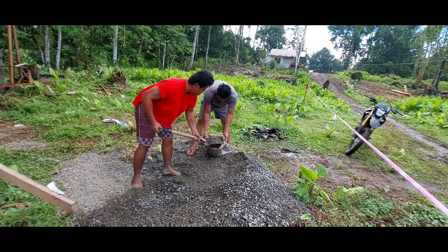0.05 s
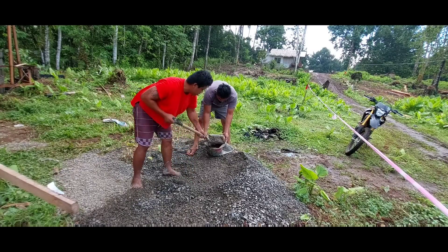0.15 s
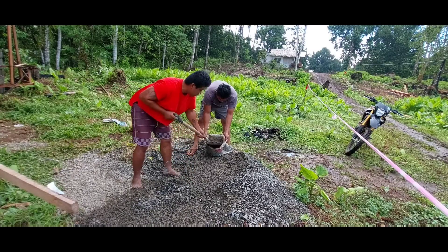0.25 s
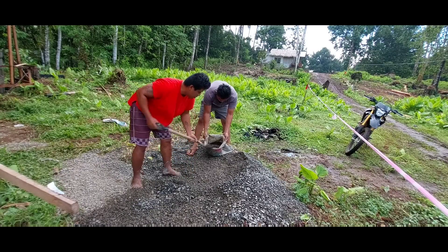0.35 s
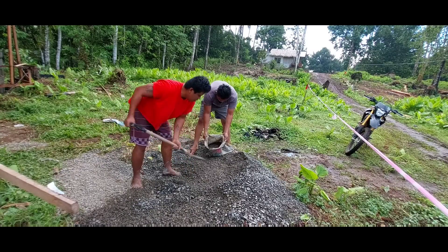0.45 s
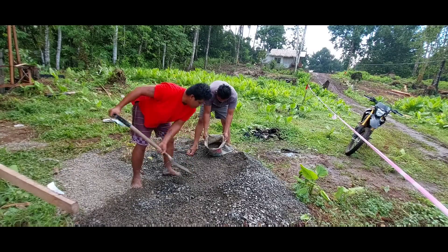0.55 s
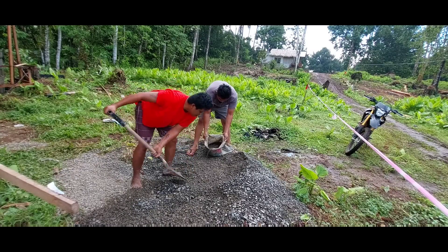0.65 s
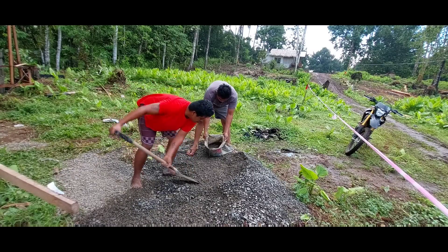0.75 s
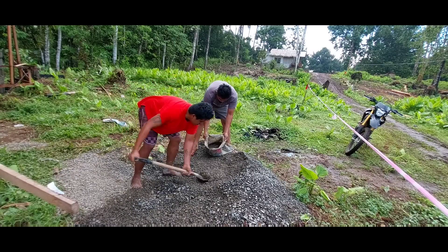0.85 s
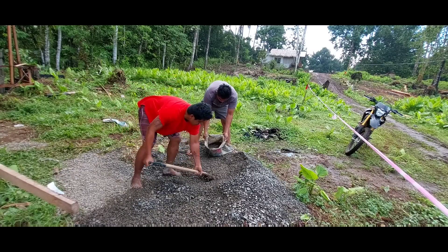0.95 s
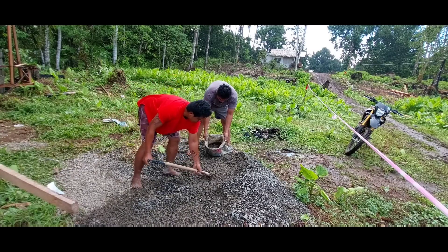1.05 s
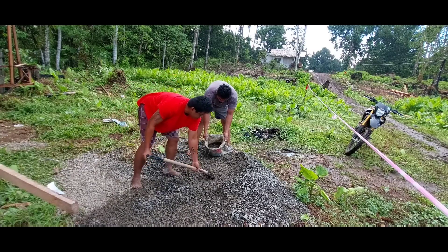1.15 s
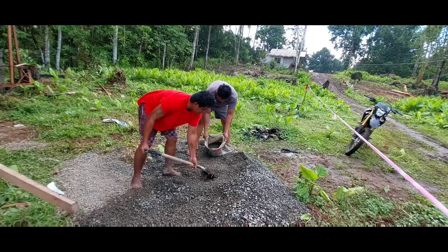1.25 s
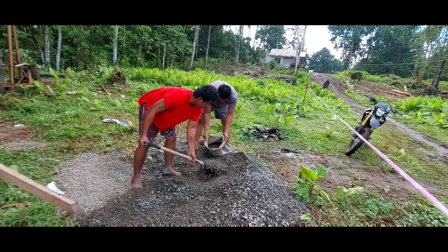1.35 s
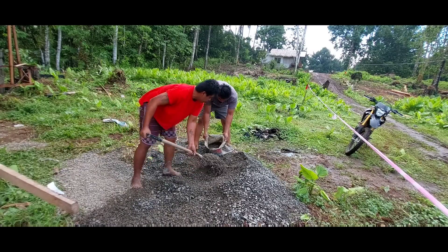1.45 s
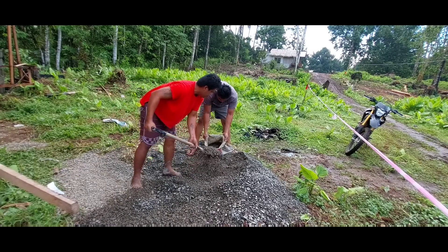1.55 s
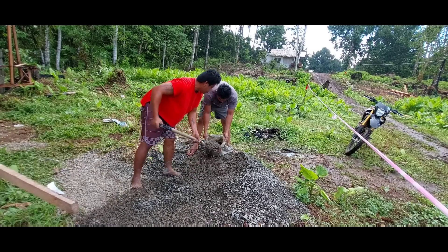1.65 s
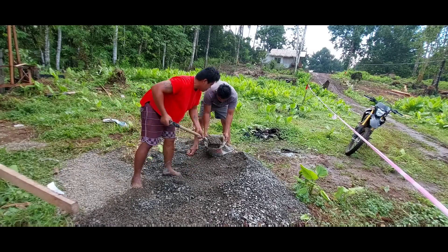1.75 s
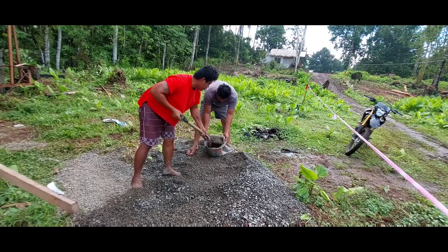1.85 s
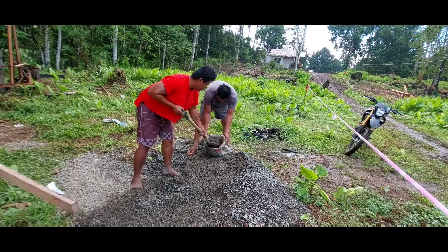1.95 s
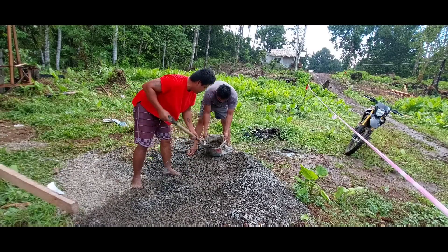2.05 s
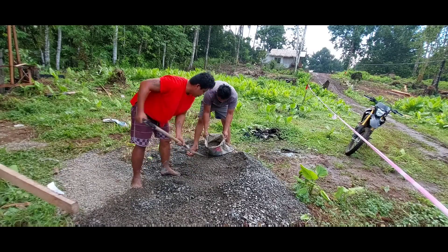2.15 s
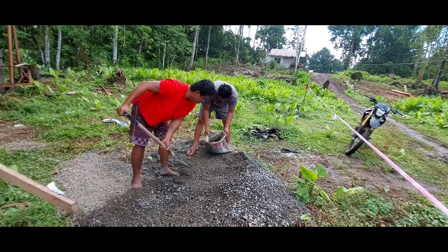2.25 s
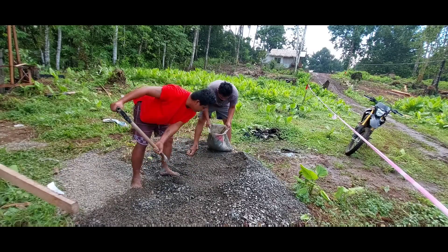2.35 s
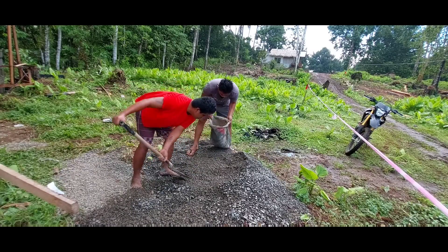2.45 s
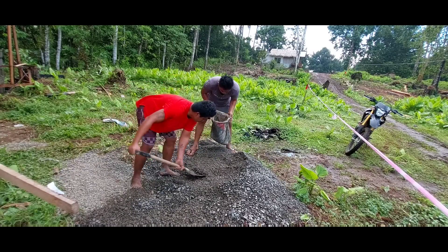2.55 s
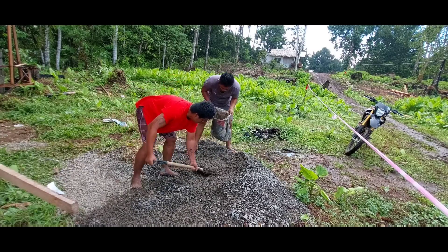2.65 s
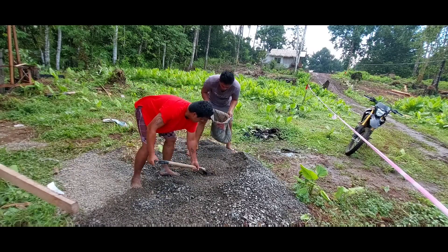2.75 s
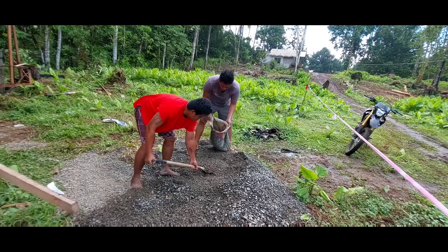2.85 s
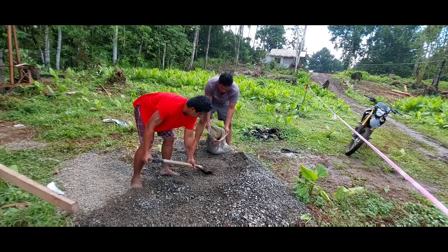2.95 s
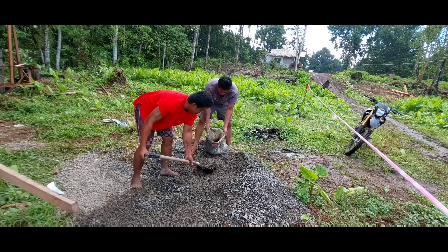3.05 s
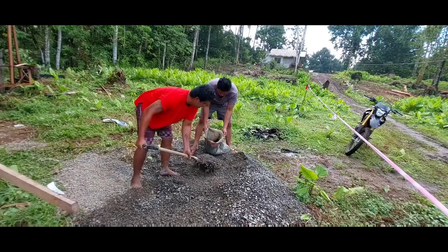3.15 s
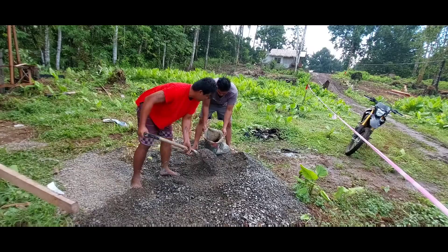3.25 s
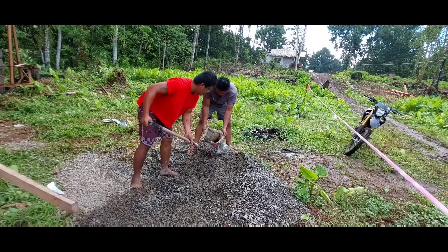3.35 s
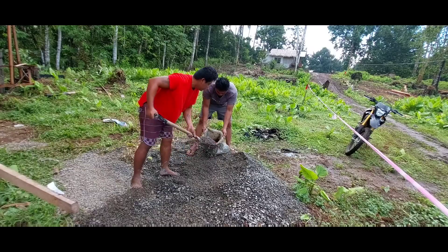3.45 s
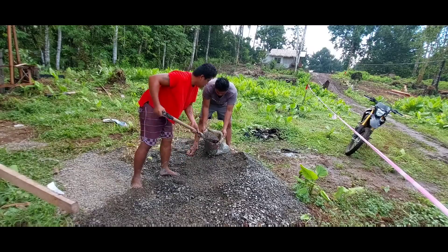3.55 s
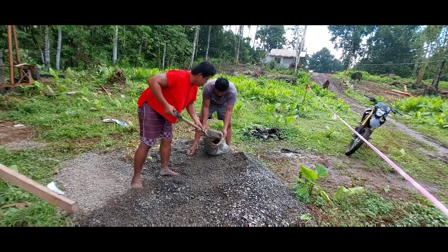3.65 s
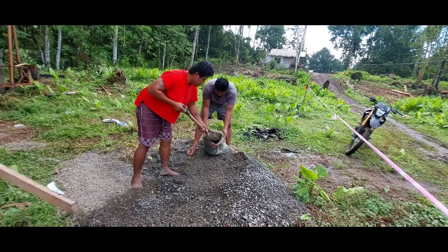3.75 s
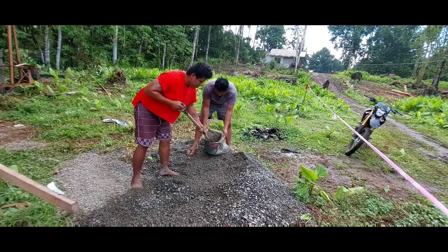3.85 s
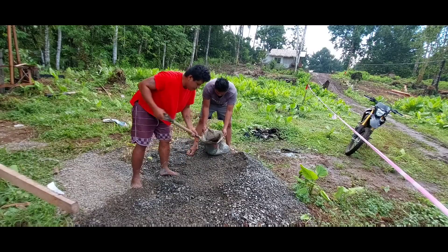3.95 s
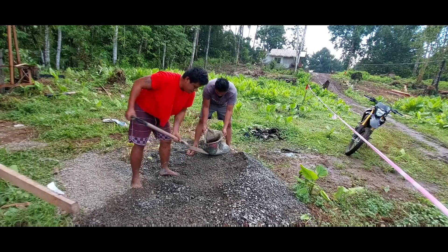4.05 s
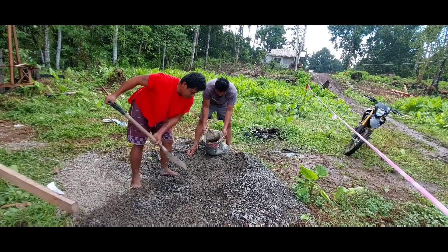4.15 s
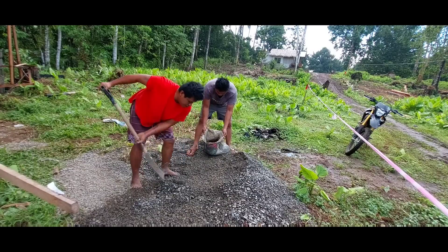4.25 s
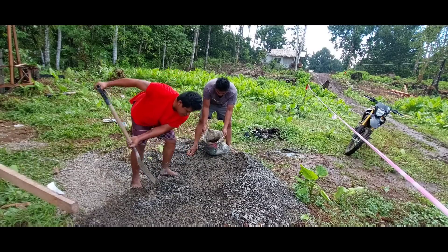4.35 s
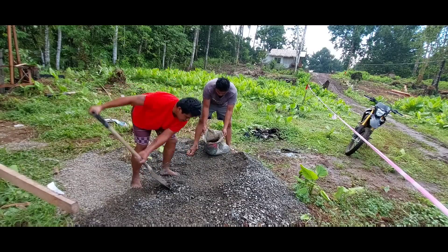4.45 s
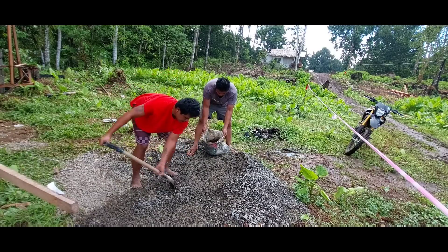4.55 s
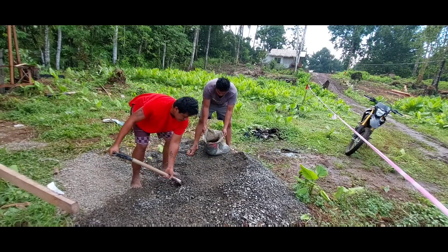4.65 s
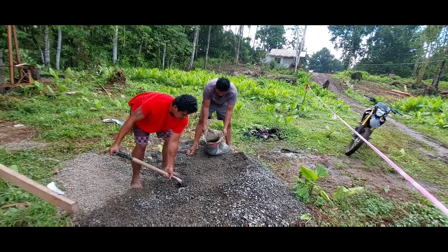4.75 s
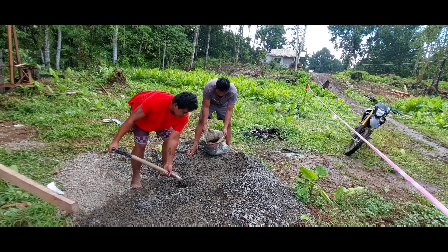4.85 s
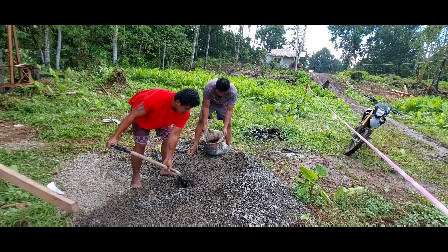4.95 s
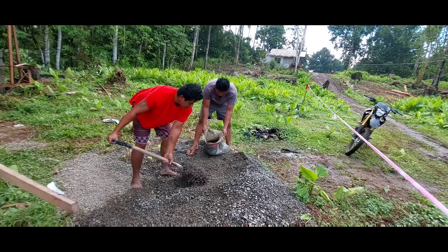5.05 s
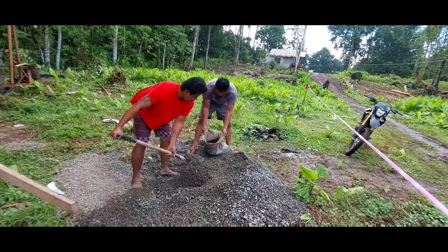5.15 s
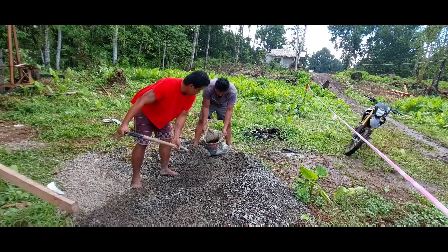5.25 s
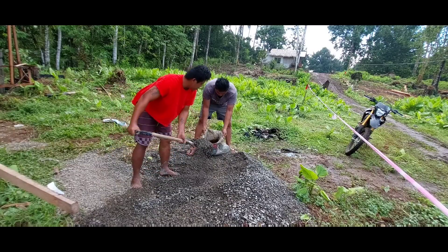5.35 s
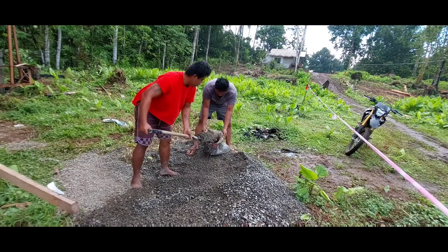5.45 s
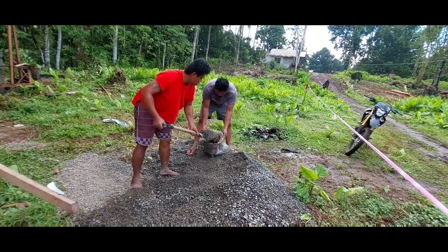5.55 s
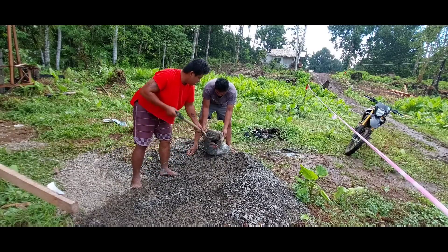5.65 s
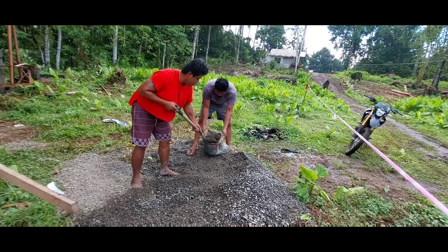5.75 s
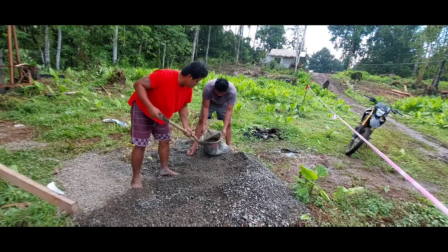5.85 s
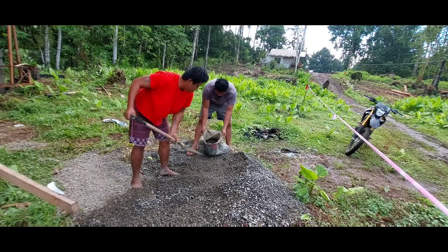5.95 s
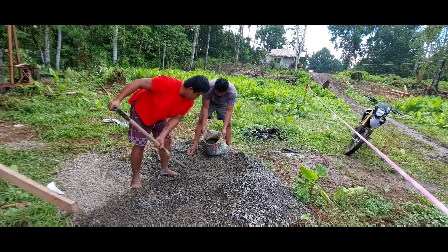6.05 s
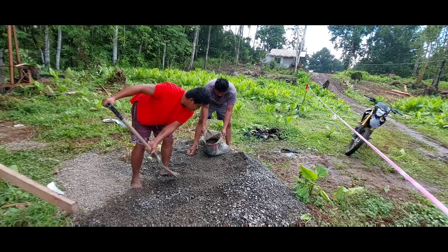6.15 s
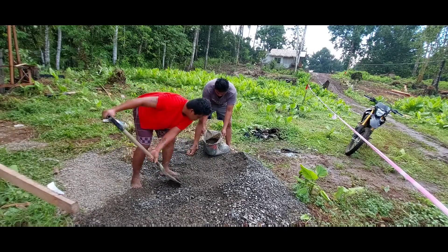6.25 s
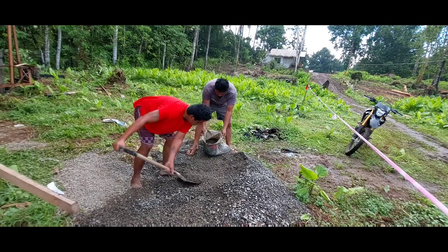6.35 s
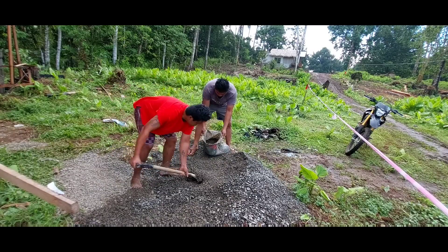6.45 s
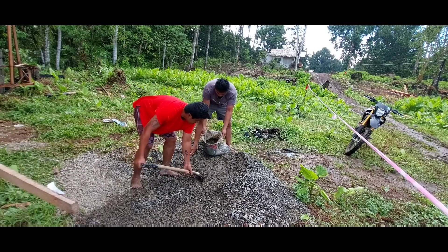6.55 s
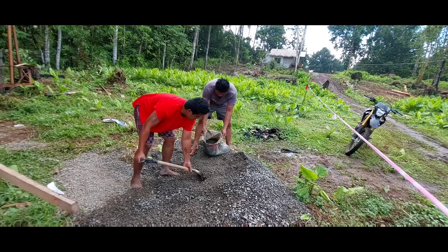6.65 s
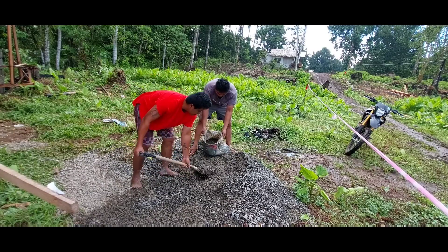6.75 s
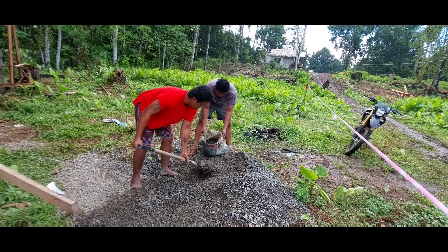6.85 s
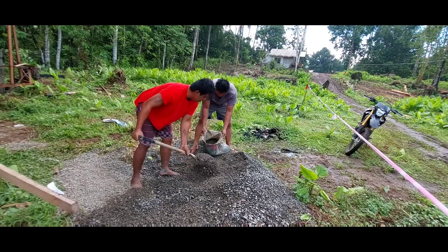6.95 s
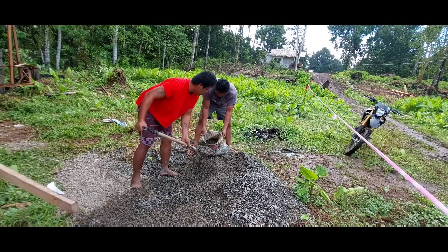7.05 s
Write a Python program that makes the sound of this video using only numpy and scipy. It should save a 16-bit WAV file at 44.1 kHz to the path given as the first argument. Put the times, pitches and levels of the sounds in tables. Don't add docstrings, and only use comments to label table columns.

```python
import sys
import numpy as np
from scipy import signal
from scipy.fft import rfft, irfft
from scipy.io import wavfile
from scipy.ndimage import uniform_filter1d

SR = 44100
rng = np.random.default_rng(int(sys.argv[2]) if len(sys.argv) > 2 else 0)


def volts_from_db(level):
    exponent = np.asarray(level, float) / 20
    return 10 ** exponent


def generate_wav(sig):
    pcm = np.round(np.clip(np.atleast_2d(sig).T, -1, 1) * 32767).astype(np.int16)
    wavfile.write(sys.argv[1], SR, pcm)


N = 313551
T = np.arange(N) / SR
HZ = np.fft.rfftfreq(N, 1 / SR)

# [f/Hz, level/dB per Hz]
AIR_COLOUR = [(15, -44), (27, -28), (48, 11.5), (70, 5.5), (89, -14), (110, -1.5), (199, -13), (974, -26),
              (1140, -26), (2310, -30), (3360, -37), (5030, -18), (9610, -26), (11300, -18), (15600, -28)]
AIR_DB = -58
# [f/Hz, likeness]
AIR_LIKENESS = [(60, 0.7), (180, 0.77), (550, 0), (1650, -0.5), (4970, 1.5), (15000, 0.5)]
# [f/Hz, left over right/dB]
MIC_COLOUR = [(60, 1), (180, 1), (550, 0.5), (1650, 0), (4970, 2), (15000, -2.5)]
# [f/Hz, width/Hz, level/dB]
INSECTS = [(11450, 750, -63), (5100, 500, -72)]
# [t/s, f/Hz, level/dB]
HUM = [(0.0, 62.3, -45.5), (0.24, 62.7, -50.5), (0.93, 63.87, -50), (1.78, 64.55, -53), (2.18, 65.1, -51),
       (3.48, 63.54, -56.5), (4.61, 64.43, -54.5), (4.69, 62.56, -53), (5.5, 64.4, -59), (5.84, 63.83, -54),
       (5.96, 65.3, -59), (6.57, 64.74, -50), (6.91, 64.96, -58), (7.11, 63.4, -60)]

# [t/s, length/s, start f/Hz, end f/Hz, level/dB]
WHISTLES = [
    (.128, .115, 5500, 3800, -53),
    (.44, .13, 5750, 3900, -51),
    (6.16, .04, 3900, 4500, -65),
    (6.19, .13, 4520, 4780, -60),
]
WHISTLE_BOW = .025
# [t/s, level/dB]
CHIPS = [(.63, -59), (.71, -59), (1.155, -52), (1.765, -54), (1.835, -54), (3.24, -56), (5.06, -57),
         (5.135, -57), (5.21, -56), (6.32, -58)]
# [start f/Hz, end f/Hz]
CHIP_HZ = (3170, 2800)
CHIP_S = .037
# [t/s, length/s, f/Hz, level/dB, second partial/dB]
CLUCKS = [
    (.145, 0.036, 460, -63, 3),
    (6.15, 0.054, 552, -53.5, -33),
    (6.29, 0.046, 544, -61, -25),
    (6.83, 0.093, 670, -59, -23),
]

# [peak t/s, rise/s, length/s, level/dB]
POURS = [
    (0.364, 0.16, 0.3, -37),
    (2.07, 0.16, 0.28, -38.5),
    (3.946, .12, .36, -37),
    (5.846, .14, 0.29, -36),
]
# [f/Hz, width/Hz]
SACK_HZ = (139, 90)
SACK_DB, SACK_LAG_S, SACK_STRETCH = -16.5, 0.072, 1.56

# [t/s, peak level/dB, f/Hz]
CRACKS = [(0.883, -14, 5200), (0.894, -24, 4000), (0.927, -14, 2600), (0.998, -6, 2450),
          (1.011, -7.5, 1840), (1.04, -14, 1360), (2.644, -11, 860), (2.678, -4, 1940), (2.72, -2.5, 2070),
          (3.053, -26, 503), (3.941, -13, 4500), (4.566, -25, 5935), (6.536, -48, 3300), (6.55, -10, 2270)]
# [t/s, peak level/dB, f/Hz]
KNOCKS = [(0.0579, -40, 2480), (0.0955, -28, 2660), (.86, -23.5, 5120), (1.3715, -31.5, 3240),
          (1.4244, -25.5, 4440), (1.4867, -37, 5360), (1.6051, -26, 5500), (1.7622, -27, 2760),
          (1.8121, -30, 4760), (3.21, -37, 1720), (3.3012, -36.5, 2540), (3.4028, -34.5, 2505),
          (3.4921, -30.5, 2730), (3.831, -30, 5560), (4.6999, -10.5, 2340), (5.0435, -36, 2590),
          (5.1227, -25.5, 2860), (5.5502, -38, 2860), (5.6277, -39, 5380), (5.6618, -31, 6200),
          (5.7653, -33, 2930), (5.9315, -43, 1630), (6.2767, -31.5, 5390), (6.4287, -15, 1800),
          (6.867, -36, 2710)]
KNOCK_SNAP_DB, KNOCK_PAN_DB = -26, 2.5
# [t/s, peak level/dB]
SNAPS = [(0.052, -36.5), (0.063, -24.5), (0.0715, -26), (0.1333, -28), (1.1438, -30), (1.1653, -31),
         (1.6888, -29), (1.7141, -37), (1.844, -25), (1.8595, -43), (1.87, -28), (1.931, -34), (3.439, -28),
         (3.6033, -24.5), (3.792, -22.5), (3.8052, -30), (3.8219, -30), (4.5601, -5.5), (5.2684, -26.5),
         (5.3409, -23.5), (5.36, -24), (5.4898, -30), (5.5167, -23), (5.5241, -33), (5.6203, -35),
         (5.6393, -28), (5.7209, -37), (6.1352, -31), (6.3499, -28), (6.3753, -19)]
SNAP_KNOCK_DB, SNAP_KNOCK_HZ, SNAP_PAN_DB = -7.5, 6160, -3
STRAYS_DB = -50.5

LAYER_EDGES_HZ = [100, 580, 3000, 8000, 21000]
# [f/Hz, level/dB per Hz]
GRAVEL_COLOUR = [(56, -29), (95, 21), (192, -8.5), (276, -5.5), (365, -5), (414, -2), (649, -9), (737, -3),
                 (1150, -5.5), (2010, -1), (7080, -2.5), (8580, -7), (12100, 3), (15600, -3)]
# [f/Hz, width/Hz, level/dB]
BLADE = [(300, 35, 3), (548, 130, -6), (808, 20, -58), (1020, 42, 3), (1546, 1800, 8.5), (2070, 1800, -70),
         (2510, 170, -19), (5120, 1900, -1.5)]
HEAP_LEAD, HEAP_SPREAD, SACK_SPREAD = 1.8, 3.6, 2.1
# [full force t/s, rise/s, length/s, level/dB, extra grit/dB]
DIGS = [
    (0.899, 0.018, 0.24, -24.5, 0),
    (2.636, 0.006, 0.26, -25.5, 3),
    (4.561, 0.005, 0.3, -28, 4.5),
    (6.460, 0.093, 0.24, -24, -3),
]
# [peak t/s, rise/s, length/s, level/dB]
SCUFFS = [
    (0.861, .004, 0.041, -46.5),
    (2.405, 0.77, .3, -49.5),
    (2.594, 0.26, 0.37, -32),
    (2.982, 0.0068, 0.27, -34),
    (3.042, 0.093, 0.17, -29.5),
    (6.057, .1, .12, -48),
    (1.504, .04, 0.083, -60),
    (5.432, 0.021, 0.03, -58),
]
# [start t/s, length/s]
TRICKLES = [
    (-.75, .83),
    (1.14, .84),
    (2.9, .96),
    (4.85, .93),
    (6.73, .85),
]
# [level/dB, extra grit/dB]
TRICKLE_FLOW = [
    (-51.5, -6),
    (-53.5, -0.5),
    (-57, 5),
    (-55, 4),
    (-56.5, -4),
]
# dig [level/dB], [sag/dB per s], [lag/s], [length factor]
DIG_DB = [-12, -2, 1.5, 1]
DIG_SAG_DB_PER_S = [-13.5, -20, 32, 114.5]
DIG_LAG_S = [0.012, 0.0022, 0.0035, 0]
DIG_STRETCH = [.95, 0.89, 1.023, 0.95]
POUR_DB = [-12, -0.5, -1.5, -3.5]
POUR_LAG_S = [0.13, 0, .03, 0.071]
POUR_STRETCH = [1.41, 1.07, 0.97, 0.73]
SCUFF_DB = [-1, -8, -14.5, -17.5]
SCUFF_STRETCH = [0.81, 1.26, 1.5, 0.79]
TRICKLE_DB = [-14.5, 0, -1, -9]
TRICKLE_DRIFT_DB = [-12, -16, -1, 13]
TRICKLE_EDGE_S = .1
REST_DB = [-79, -85, -71.5, -60.5]
DIG_CURVE = (1.34, 3.56)
POUR_CURVE = (1.46, 0.98)
SCUFF_CURVE = (1.47, 0.8)


def evened(x):
    return x / np.sqrt(np.mean(x ** 2) + 1e-20)


def read(points, hz):
    f, value = np.transpose(points)
    return np.interp(np.log(hz + 1), np.log(f + 1), value)


def add(mix, s, sound):
    part = mix[:, round(s * SR):][:, :sound.shape[1]]
    part += sound[:, :part.shape[1]]


def resonate(x, hz, width):
    turn = np.exp(2j * np.pi * np.cumsum(hz * np.ones(N)) / SR)
    r = np.exp(-np.pi * width / SR)
    return 2 * (turn * signal.lfilter([1 - r], [1, -r], x / turn)).real


def resonant_noise(hz, width):
    return evened(resonate(resonate(rng.standard_normal(N), hz, width), hz, width))


def wander(top_hz):
    slow = rfft(rng.standard_normal(N)) / (1 + (HZ / top_hz) ** 4)
    return evened(irfft(slow * (HZ > 12), N))


def burst(hz, spread, rise_s):
    u = np.arange(240) / SR / rise_s
    partials = sum(np.sin(2 * np.pi * hz * m * u * rise_s) for m in (1 / spread, 1, spread))
    x = partials * u ** 2 * np.exp(-2 * u)
    x -= x.mean()
    return x / abs(x).max()


def arc(peak_s, rise_s, length_s, curve):
    t = np.arange(0, N / SR + .01, .001)[None]
    before, after = np.maximum(peak_s - t, 0), np.maximum(t - peak_s, 0)
    return -30 * ((before / rise_s) ** curve[0] + (after / length_s) ** curve[1]), after


def air():
    frames, hz = N // 512 + 5, np.fft.rfftfreq(2048, 1 / SR)
    a, b, c, d, patches = rng.standard_normal((frames, 1025, 5)).T
    patches = evened(uniform_filter1d(uniform_filter1d(patches, 24, 0), 8, 1))
    same = np.clip(read(AIR_LIKENESS, hz), -1, 1)[:, None]
    left = a + 1j * b
    right = same * left + np.sqrt(1 - same ** 2) * (c + 1j * d)
    z = np.array([left, right]) * volts_from_db(read(AIR_COLOUR, hz)[:, None] + 2.8 * patches)
    x = signal.istft(z, nperseg=2048, noverlap=1536)[1][:, :N]
    above = irfft(rfft(x.mean(0)) * (HZ > LAYER_EDGES_HZ[0]), N)
    return volts_from_db(AIR_DB) * x / np.std(above)


def insects():
    out = np.zeros((2, N))
    for hz, width, db in INSECTS:
        ears = [resonate(resonate(rng.standard_normal(N), hz, width), hz, width) for ear in "LR"]
        out += volts_from_db(db) * evened(np.array(ears))
    return out


def generator():
    s, hz, db = np.transpose(HUM)
    hz = uniform_filter1d(np.interp(T, s, hz), 20000)
    tone = np.sin(2 * np.pi * np.cumsum(hz) / SR)
    halo = resonant_noise(hz, 27)
    octave = resonant_noise(2 * hz, 38)
    return volts_from_db(np.interp(T, s, db)) * (2.55 * tone + 0.76 * halo + 0.2 * octave)


def birds():
    out = np.zeros((2, N))
    for s, length, start_hz, end_hz, db in WHISTLES + [(s, CHIP_S, *CHIP_HZ, db) for s, db in CHIPS]:
        u = np.linspace(0, 1, int(length * SR))
        flutter = volts_from_db(2.5 * evened(uniform_filter1d(rng.standard_normal(9000), 300)))
        middle_hz = (start_hz + end_hz) / 2 * (1 + WHISTLE_BOW)
        hz = np.polyval(np.polyfit([0, .5, 1], [start_hz, middle_hz, end_hz], 2), u)
        turns = np.cumsum(hz) / SR + 0.2 * rng.random((2, 1))
        swell = np.sin(np.pi * u) ** 0.3 * flutter[:len(u)]
        add(out, s, volts_from_db(db) * np.sin(2 * np.pi * turns) * swell)
    for s, length, hz, db, second_db in CLUCKS:
        u = np.linspace(0, 1, int(length * SR))
        a = 2 * np.pi * hz * length * u * (1 - 0.0067 * u)
        tone = np.sin(a) + volts_from_db(second_db) * (np.sin(2 * a) + .4 * np.sin(3 * a))
        add(out, s, volts_from_db(db) * tone * np.sin(np.pi * u) * np.ones((2, 1)))
    return out + .2 * np.roll(out[::-1], 700, axis=1)


def sack():
    level = 0
    for s, rise, length, db in POURS:
        rise_s = (rise + SACK_LAG_S) * SACK_STRETCH
        level = level + volts_from_db(db + arc(s + SACK_LAG_S, rise_s, length * SACK_STRETCH, POUR_CURVE)[0][0])
    thump = resonant_noise(*SACK_HZ)
    return volts_from_db(SACK_DB) * np.interp(T * 1000, np.arange(len(level)), level) * thump


def pebbles():
    out = np.zeros((2, N))
    rows = [(s, db - 4, hz, db - 13, 0) for s, db, hz in CRACKS]
    rows += [(s, db, hz, db + KNOCK_SNAP_DB, KNOCK_PAN_DB) for s, db, hz in KNOCKS]
    strays = []
    for start, length in TRICKLES[:4]:
        for u, v in rng.random((11, 2)):
            strays.append((max(start + length * (1 - u ** 2), 0), STRAYS_DB + 8 * v))
    rows += [(s, db + SNAP_KNOCK_DB, SNAP_KNOCK_HZ, db, SNAP_PAN_DB) for s, db in SNAPS + strays]
    chances = rng.random((len(rows), 3))
    for (s, knock_db, hz, snap_db, pan), (gap, lag, shade) in zip(rows, chances):
        knock = volts_from_db(knock_db) * burst(1.12 * hz, 1.25, 1.05 / hz)
        snap = volts_from_db(snap_db) * burst(11300 + 1200 * shade, 1.2, .00016)
        tick = knock + snap
        tick = tick + .4 * np.roll(tick, int(25 + 40 * gap))
        sides = volts_from_db(1.5 + np.array([[pan], [-pan]]) / 2)
        add(out, s, sides * [tick, np.roll(tick, int(1.4 * lag))])
    return out


def strokes():
    def col(v):
        return np.array(v)[:, None]

    grit, parts = col([0, 0, 0, 1]), []
    for s, rise, length, db, grit_db in DIGS:
        lag = col(DIG_LAG_S)
        shape, after = arc(s + lag, rise + 2 * lag, length * col(DIG_STRETCH), DIG_CURVE)
        parts.append(db + col(DIG_DB) + grit_db * grit + shape - col(DIG_SAG_DB_PER_S) * after)
    for s, rise, length, db in POURS:
        lag = col(POUR_LAG_S)
        shape = arc(s + lag, rise + 2 * lag, length * col(POUR_STRETCH), POUR_CURVE)[0]
        parts.append(db + col(POUR_DB) + shape)
    for s, rise, length, db in SCUFFS:
        stretch = col(SCUFF_STRETCH)
        parts.append(db + col(SCUFF_DB) + arc(s, rise * stretch, length * stretch, SCUFF_CURVE)[0])
    for (start, length), (db, grit_db) in zip(TRICKLES, TRICKLE_FLOW):
        onset, after = arc(start, TRICKLE_EDGE_S, 1e9, (1, 1))
        stop = arc(start + length, 1e9, TRICKLE_EDGE_S, (1, 1))[0]
        drift = col(TRICKLE_DRIFT_DB) * np.minimum(after / length, 1) ** 1.14
        parts.append(db + col(TRICKLE_DB) + grit_db * grit + drift + onset + stop)
    power = sum(volts_from_db(2 * p) for p in parts) + volts_from_db(2 * col(REST_DB))
    return [np.interp(T * 1000, np.arange(len(db)), db) for db in 10 * np.log10(power)]


def collisions(per_s, size_db, clump_db, lead, lag, patchy_db, count=14):
    clumps, drift = volts_from_db(clump_db * wander(30)), volts_from_db(patchy_db * wander(61))
    size = volts_from_db(size_db * np.minimum(rng.exponential(1, N), 5)) * (rng.random(N) < per_s / SR)
    size *= clumps / np.sqrt(per_s)
    delay = np.round(lead + lag * rng.laplace(size=N)).astype(int)
    late = np.clip(np.arange(N) + delay, 0, N - 1)
    stone, t, out = rng.integers(0, count, N), np.arange(400) / SR, np.zeros((2, N))
    cycles = (1.2, 3.5)
    for k, hz in enumerate(np.geomspace(250, 14000, count)):
        click = np.sin(2 * np.pi * hz * t + 1) * np.exp(-t * hz / cycles[k % 2])
        left = size * (stone == k) * np.roll(drift, k * N // count)
        trains = np.array([left, np.bincount(late, left, N)])
        out += signal.oaconvolve(trains, click[None] / np.linalg.norm(click), axes=1)[:, :N]
    return out


def shovel():
    levels = strokes()
    per_s = np.clip(14000 * volts_from_db(.35 * (levels[2] + 55)), 10000, 40000)
    digging = np.clip((levels[2] + 40) / 8, 0, 1)
    spread = SACK_SPREAD + (HEAP_SPREAD - SACK_SPREAD) * digging
    z = rfft(collisions(per_s, size_db=1.0, clump_db=0.9, lead=HEAP_LEAD * digging, lag=spread, patchy_db=2.0))
    z /= np.sqrt(uniform_filter1d((abs(z) ** 2).mean(0), 2001)) + 1e-9
    ring = sum(volts_from_db(db) / (1 + 2j * (HZ - f) / w) for f, w, db in BLADE)
    z *= volts_from_db(read(GRAVEL_COLOUR, HZ)) * (1 + ring)
    edges = [1 / (1 + (f / (HZ + 1)) ** 10) for f in LAYER_EDGES_HZ]
    out = np.zeros((2, N))
    for low, high, db in zip(edges, edges[1:], levels):
        layer = irfft(z * np.sqrt(np.clip(low - high, 0, 1)), N)
        out += volts_from_db(db) * layer / np.std(layer.mean(0))
    return out


def scene():
    return air() + insects() + generator() + birds() + sack() + pebbles() + shovel()


def band_limit(x):
    return signal.sosfilt(signal.butter(12, 16630, fs=SR, output="sos"), x)


def record(dry):
    side = volts_from_db(read(MIC_COLOUR, HZ) / 2)
    mix = irfft(rfft(dry) * [side, 1 / side] * (HZ < 15720), N)
    return band_limit(mix)


dry = scene()
out = record(dry)
generate_wav(out)
```